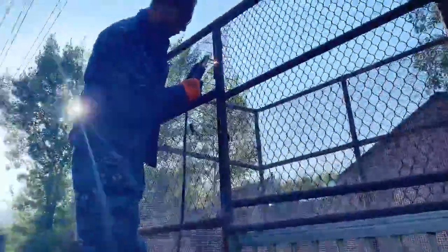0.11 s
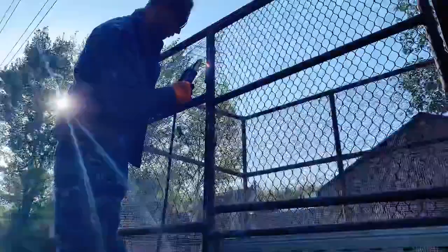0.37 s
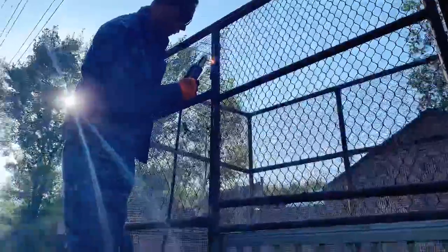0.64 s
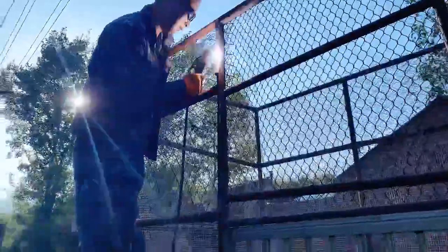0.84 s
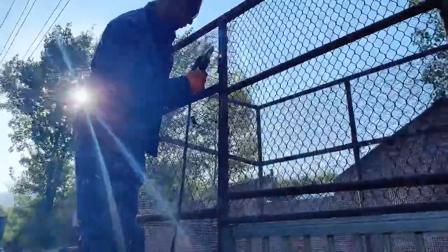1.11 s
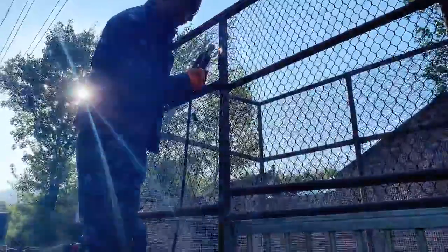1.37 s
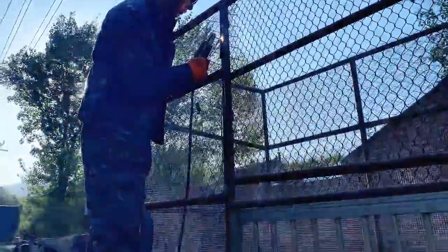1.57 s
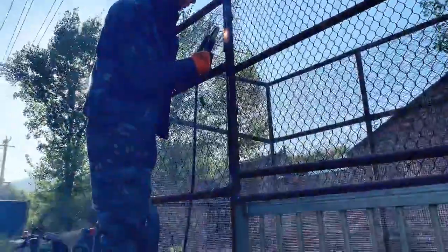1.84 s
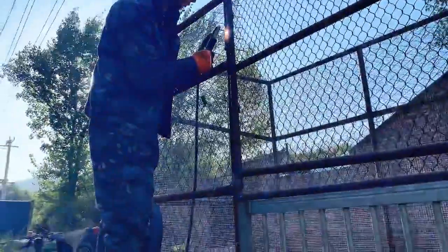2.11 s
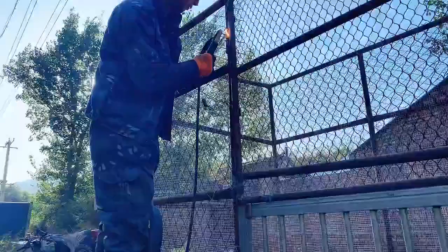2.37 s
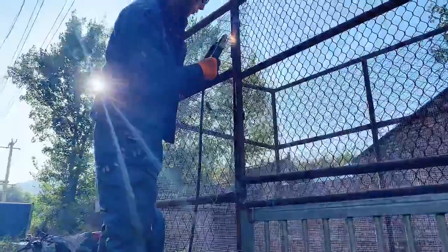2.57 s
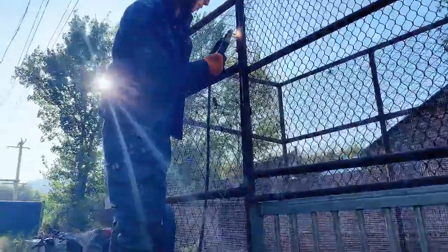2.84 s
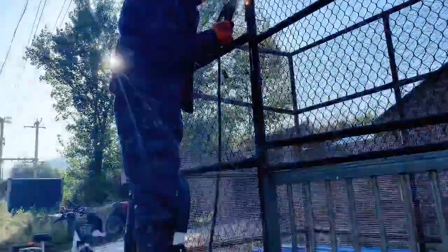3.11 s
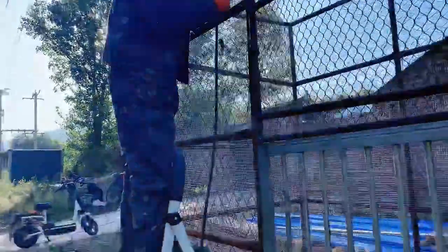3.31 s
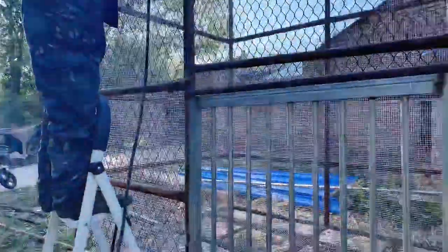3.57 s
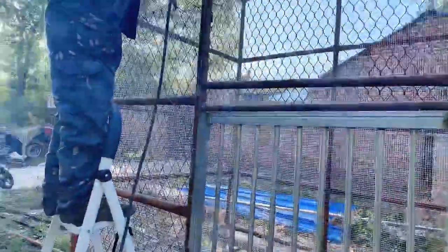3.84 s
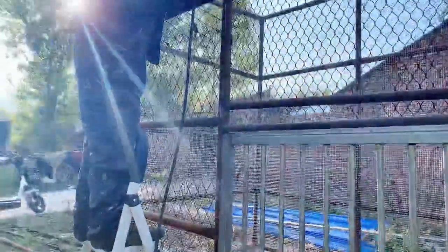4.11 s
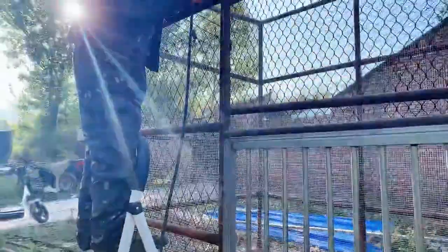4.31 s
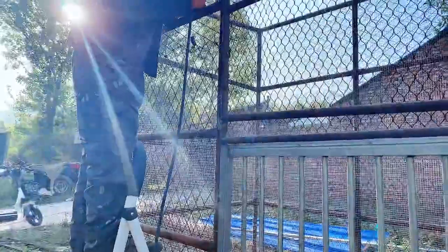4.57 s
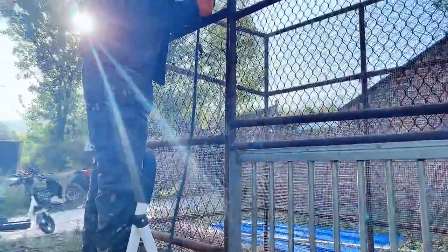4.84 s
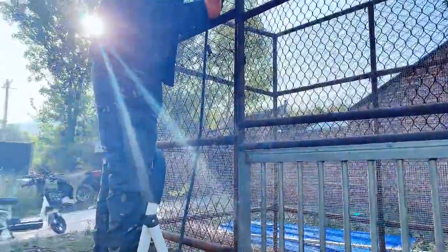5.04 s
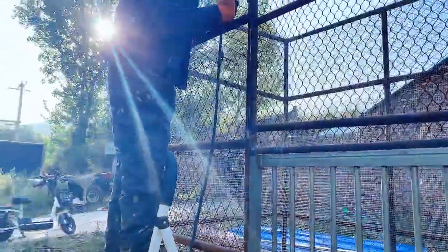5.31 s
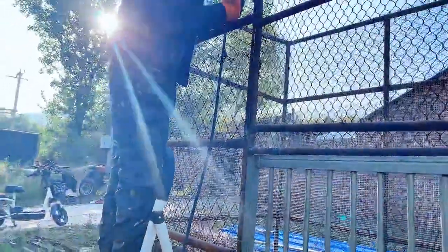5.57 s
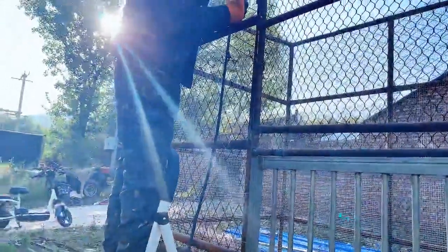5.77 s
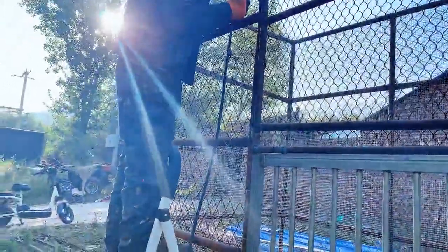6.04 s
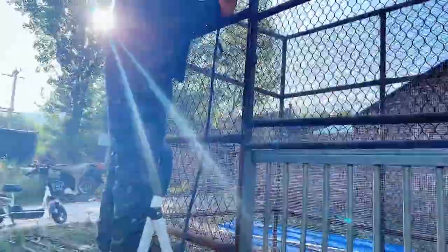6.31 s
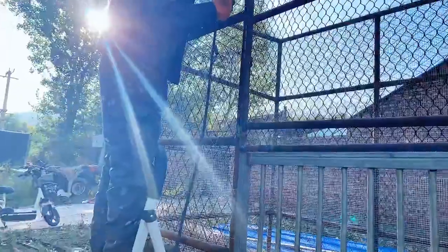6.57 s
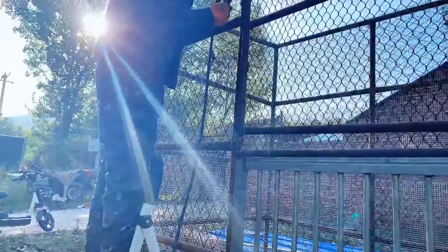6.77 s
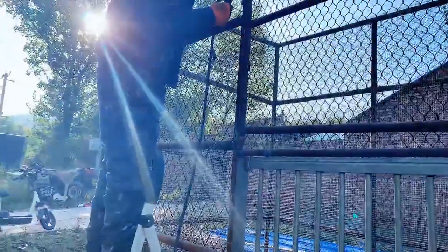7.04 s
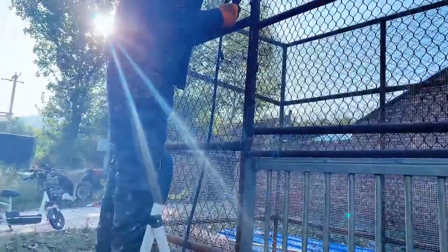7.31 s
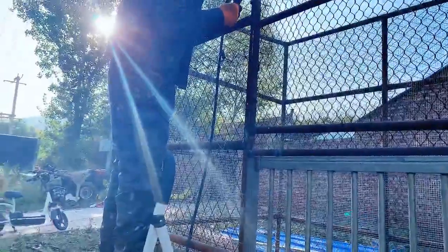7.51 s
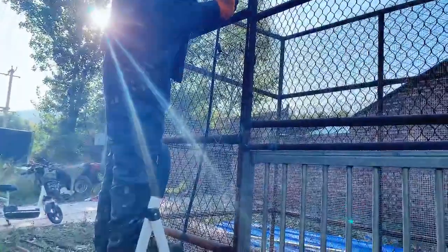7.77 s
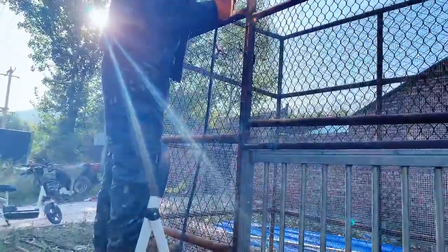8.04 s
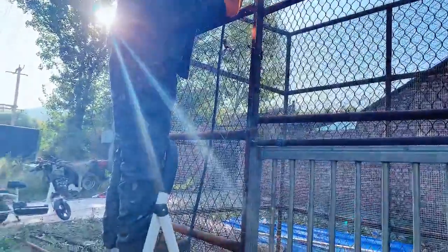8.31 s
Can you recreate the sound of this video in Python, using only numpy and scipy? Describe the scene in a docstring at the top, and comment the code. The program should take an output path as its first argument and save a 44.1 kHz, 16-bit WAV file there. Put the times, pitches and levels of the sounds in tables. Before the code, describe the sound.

Stick welding on a steel fence outdoors: crackling arc sizzle and sharp pops in short runs, tubes ringing faintly, wind rumble, distant engine thuds later.

```python
"""An arc sizzles and pops in short runs as a stick welder tacks a steel fence outdoors, and the tubes ring under it.
The arc is coloured noise with timed snaps and a close echo; the tubes are resonances shaken by sparks and pops.
The lowest mode murmurs on, shaped low noise buffets the microphone, and a faint wash and yard echoes lie behind.
Short scuffs make knocks on the steel and the thump of some pops, a slow engine thuds far off as pressure swings,
and near the end the rod sticks: a few unsteady harmonics and a rasp buzz at about twice the mains."""
import sys
import numpy as np
from scipy import signal
from scipy.io import wavfile
from scipy.ndimage import uniform_filter1d, minimum_filter1d, map_coordinates

SR = 44100
rng = np.random.default_rng(int(sys.argv[2]) if len(sys.argv) > 2 else 0)


def dump(signal):
    """Clip the signal to [-1, 1] and save it as 16-bit WAV at the path in sys.argv[1]."""
    limited = np.clip(np.atleast_2d(signal).T, -1, 1)
    pcm = np.round(limited * 32767).astype(np.int16)
    wavfile.write(sys.argv[1], SR, pcm)


def boost_factor(decibels):
    """Convert a level in decibels to a linear amplitude factor."""
    exponent = np.asarray(decibels, float) / 20
    return 10 ** exponent


N = 370440
T = np.arange(N) / SR  # s
HZ = np.fft.rfftfreq(4096, 1 / SR)


def evened(x):
    """Scales to rms 1."""
    return x / np.sqrt(np.mean(x ** 2) + 1e-20)


def read(points, hz):
    """Reads a spectrum table on a log-frequency axis."""
    f, value = np.transpose(points)
    return np.interp(np.log(hz + 1), np.log(f + 1), value)


def humps(modes, valley_db):
    """Gain in dB of resonances standing over a flat valley."""
    power = sum(boost_factor(db) ** 2 / (1 + (2 * (HZ - hz) / width) ** 2) for hz, width, db in modes)
    return 10 * np.log10(power + boost_factor(valley_db) ** 2)


def response(db):
    """The causal (minimum-phase) impulse response of a gain curve, energy 1."""
    log_gain = np.log(boost_factor(np.maximum(db, -100)))
    circle = np.concatenate([log_gain, log_gain[-2:0:-1]])
    spectrum = np.exp(np.conj(signal.hilbert(circle)))
    taps = np.fft.ifft(spectrum).real[:2048] * np.hanning(4096)[2048:]
    return taps / np.linalg.norm(taps)


def colour(x, taps):
    """Convolution cut to the length of the scene."""
    return signal.oaconvolve(x, taps)[:N]


def impulses(times, sizes):
    """A click train."""
    train = np.zeros(N)
    at = np.round(np.asarray(times) * SR).astype(int)
    np.add.at(train, np.clip(at, 0, N - 1), sizes)
    return train


def level(rows):
    """Gain drawn through (s, dB) points, silent outside them."""
    s, db = np.transpose(rows)
    return boost_factor(np.interp(T, s, db)) * (T >= s[0]) * (T < s[-1])


def bumps(rows):
    """Bell-shaped rises of gain."""
    return sum(boost_factor(db) * np.exp(-(2 * (T - s) / length) ** 2) for s, db, length in rows)


def wander(size):
    """Slow chance of rms 1, smooth over size samples."""
    return evened(uniform_filter1d(uniform_filter1d(rng.standard_normal(N), size), size))


def shifting(x, patchy_db, size, count):
    """The colour drifts in patches three bins wide and count frames long."""
    z = signal.stft(x, nperseg=size)[2]
    patches = uniform_filter1d(rng.standard_normal(z.shape), size=3, axis=0)
    patches = uniform_filter1d(patches, size=count, axis=1)
    return signal.istft(z * boost_factor(patchy_db * evened(patches)), nperseg=size)[1][:N]


def crackle(per_s, spread_db, hiss, clump_db):
    """Random sparks in clumps, most small and a few larger, over a hiss."""
    clumps = boost_factor(clump_db * wander(size=130))
    size = np.minimum(rng.exponential(1, N), 2.5)
    sparks = boost_factor(spread_db * size) * (rng.random(N) < per_s * clumps / SR)
    sparks = evened(sparks * rng.choice([-1, 1], N))
    return evened(sparks + hiss * np.sqrt(clumps) * rng.standard_normal(N))


# one row a run of the arc, gains before flares and wavering:
# start_s, end_s, sizzle_db, ringing_at_start_db, ringing_at_end_db
RUNS = [(0.0, 0.873, -28, -33.5, -34), (1.165, 2.052, -32, -41, -38), (2.06, 3.092, -30, -40, -39),
        (3.425, 4.333, -30.5, -48, -34.5), (4.897, 5.94, -30.5, -33.5, -39),
        (6.152, 6.213, -36.5, -45, -32), (6.751, 7.881, -28.5, -36, -30), (7.894, 8.4, -29, -25, -30.5)]
# the arc flares at each strike and when the gap shortens, and sometimes falters:
# peak_s, sizzle_lift_db, ringing_lift_db
FLARES = [(0.597, 0, 7.5), (0.7, -9.5, -5), (0.754, 2.5, 4.5), (1.173, 9.5, 14), (1.3, 6, 6),
          (1.345, 8.5, -1.5), (1.54, -3, 1), (2.08, 3, 7.5), (2.24, 2.5, 11.5), (2.474, 2.5, 16.5),
          (2.647, 1, 14.5), (2.76, 7, 3), (3.426, 12.5, 19.5), (3.565, 2.5, 7.5), (3.67, -0.5, 11),
          (4.375, 17, 22), (4.9, 9.5, 11.5), (5.193, 8, 8), (5.36, 2, 5), (5.415, 9, -1.5), (5.72, -1, 5.5),
          (6.19, 13, 7.5), (6.221, 6.5, 9.5), (6.762, -5, -4), (6.785, -8, -2.5), (6.865, -12, -12),
          (7.019, -4.5, 4.5), (7.12, -3, 6), (7.911, 3.5, 5.5), (8.065, -9.5, -3.5), (8.095, 8.5, 9.5),
          (8.166, 7.5, 6.5)]
FLARE_RISE_S, FLARE_FALL_S = 0.017, 0.045
CATCH_S = 0.00048  # the arc catches
FADE_DB_PER_S, UNSTEADY_DB = 300, 1.0  # dies away as the rod lifts, wavers while it burns


def burning():
    """Gains of sizzle and ringing for every run: a held level, lifted by flares, fading at the end."""
    lift_db = UNSTEADY_DB * np.array([wander(size=1200), wander(size=1200)])
    for s, *gains_db in FLARES:
        flare = np.exp(np.minimum((T - s) / FLARE_RISE_S, (s - T) / FLARE_FALL_S))
        lift_db += np.outer(gains_db, flare)
    out = []
    for start, end, sizzle_db, first_db, last_db in RUNS:
        held_db = np.array([sizzle_db + 0 * T, np.interp(T, [start, end], [first_db, last_db])])
        fade_db = FADE_DB_PER_S * np.maximum(T - end, 0)
        out.append(np.clip((T - start) / CATCH_S, 0, 1) * boost_factor(held_db + lift_db - fade_db))
    return np.array(out)


# what posts, glove and body near the arc make of its treble, one list a run,
# before the arc widens the narrow ones and softens them all: pitch_hz, width_hz, level_db
STANCES = [
    [(3930, 160, -3), (4960, 130, -11), (6040, 280, -14), (7140, 160, -7), (8630, 97, -9), (9800, 200, -12),
     (13000, 200, -10)],
    [(3750, 66, -6), (4870, 210, -8.5), (5700, 230, -11), (7130, 270, -3.5), (8680, 200, -5.5),
     (10030, 210, -8), (12700, 330, -7), (13500, 260, -12)],
    [(3690, 130, -1), (4930, 38, -2), (5670, 580, -3.5), (7440, 180, 1.5), (8800, 280, 0), (10340, 170, -3),
     (12200, 290, -1), (13600, 400, -6), (2940, 105, -4.5)],
    [(3830, 100, 0.5), (5470, 560, 2), (8370, 1600, -1.5), (11000, 420, -2), (12700, 660, -4)],
    [(3860, 200, -6.5), (5370, 180, -3), (6190, 260, 3), (8030, 230, 0.5), (9000, 200, -1.5),
     (9800, 200, -11), (12000, 460, -5), (13500, 710, -13)],
    [(3900, 260, 2), (5230, 630, 2), (7500, 1300, -2.5)],
    [(3170, 200, -4.5), (3870, 74, -6), (5940, 210, -4), (9050, 300, -8), (13070, 200, -1.5)],
    [(3100, 150, 17), (3900, 62, 15), (5230, 440, 8), (6100, 170, 9.5), (8140, 450, 4), (12400, 820, -20)],
]
# spectrum of the sizzle, shape only: pitch_hz, level_db (per Hz)
SIZZLE_SPECTRUM = [(1500, -45.5), (2600, -16), (3800, -12.5), (7200, -9), (10600, -15.5), (13100, -16),
                   (14400, -17.5), (15400, -50), (16400, -36)]
# spectrum of a pop, shape only: pitch_hz, level_db (per Hz)
POP_SPECTRUM = [(900, -35.5), (2100, -10.5), (3000, -18.5), (4500, -4), (7500, 4.5), (10500, -5),
                (13500, -2), (15000, -11), (16400, -52)]
# drops of metal shorting the arc: time_s, level_db (relative)
POPS = [(0.0419, -1.6), (0.0623, -6.7), (0.0751, 0.8), (0.1212, -7.9), (0.1345, 0.2), (0.1599, -3.1),
        (0.1761, -7.6), (0.1801, -1.9), (0.2148, -7.7), (0.2206, -1.9), (0.2449, -5.4), (0.2531, -2.7),
        (0.2896, -4.0), (0.3298, -5.4), (0.3814, -3.5), (0.3956, -6.4), (0.4059, -3.1), (0.4623, -7.2),
        (0.4711, -3.3), (0.4946, -4.6), (0.5458, -0.5), (0.5779, -7.8), (0.5904, -0.7), (0.6007, -1.7),
        (0.6232, 0.6), (0.7144, -1.9), (0.7573, -0.6), (0.7685, -2.4), (0.7842, -0.8), (0.8585, -5.3),
        (1.1721, -3.0), (1.3469, -0.2), (1.462, -0.2), (1.587, -1.0), (1.663, -0.6), (1.7078, -1.8),
        (1.7492, -5.1), (1.7803, 0.9), (1.8436, -5.0), (1.9008, -4.2), (1.9832, -0.9), (2.0783, -6.2),
        (2.0921, -5.6), (2.1012, -4.8), (2.1073, -4.8), (2.1648, 0.6), (2.1743, -1.8), (2.2304, -0.9),
        (2.2354, -4.1), (2.2638, -1.7), (2.2713, -0.4), (2.2797, -1.0), (2.3008, -0.4), (2.319, -0.1),
        (2.3249, -7.7), (2.3427, -1.6), (2.3839, -0.3), (2.3897, -4.9), (2.3967, -2.6), (2.4469, -2.0),
        (2.4612, -6.4), (2.4769, -0.5), (2.5387, -0.9), (2.5901, -8.0), (2.595, -5.2), (2.6164, -1.2),
        (2.648, -0.8), (2.6988, -6.5), (2.7038, 0.2), (2.7302, -7.8), (2.7618, 0.8), (2.7659, 0.9),
        (2.8234, -8.0), (2.9095, -0.4), (2.9133, -0.4), (2.9366, -6.8), (2.9774, -4.8), (3.0012, -2.2),
        (3.007, -6.3), (3.028, -7.7), (3.0361, -7.6), (3.0495, -0.7), (3.4277, -4.0), (3.5653, -0.2),
        (3.6613, -2.3), (3.7593, -0.1), (3.8093, -0.4), (3.8578, -5.5), (3.9074, -0.1), (3.9388, -2.0),
        (3.9716, -5.4), (3.986, -2.1), (3.99, -4.8), (4.041, -2.4), (4.068, -1.3), (4.1365, 0.4),
        (4.1808, -7.5), (4.1896, -4.6), (4.2046, -5.6), (4.2094, -7.7), (4.2277, -0.1), (4.2749, -1.4),
        (4.3175, -1.8), (4.3363, 0.3), (4.901, -6.1), (5.0268, -6.3), (5.0312, -5.8), (5.091, -0.9),
        (5.1241, -5.8), (5.1381, -2.2), (5.1934, 0.2), (5.2001, -2.7), (5.2217, -5.2), (5.2546, -5.7),
        (5.3078, -6.8), (5.314, -7.1), (5.3685, -6.2), (5.374, -7.6), (5.4133, 0.3), (5.4296, -2.9),
        (5.4662, -4.2), (5.5152, -1.5), (5.625, -0.0), (5.6814, -3.9), (5.7085, -2.3), (5.7251, -1.8),
        (5.7401, -5.5), (5.7453, -7.8), (5.7679, -4.4), (5.7859, -3.2), (5.8995, -7.9), (6.1569, -2.3),
        (6.1861, -8.0), (6.765, -5.3), (6.7822, -2.1), (6.7859, 0.4), (6.7892, -5.5), (6.7941, -1.8),
        (6.8044, -4.0), (6.8626, -6.1), (6.8732, -1.2), (6.8825, -1.3), (6.8979, -0.9), (6.9298, -2.3),
        (6.9646, -3.9), (6.9728, -2.2), (7.0222, -7.2), (7.0259, -0.9), (7.0501, -5.7), (7.0808, -5.7),
        (7.0855, 0.3), (7.1216, -2.6), (7.1493, -2.0), (7.2391, -0.8), (7.2953, 1.2), (7.3266, -3.8),
        (7.3294, -7.1), (7.3383, -0.6), (7.3942, -2.0), (7.3993, -5.6), (7.414, -7.8), (7.4626, -0.3),
        (7.4982, -6.8), (7.5247, 1.2), (7.5414, -7.1), (7.5498, -0.3), (7.5585, -1.0), (7.6089, -4.8),
        (7.6934, -0.8), (7.6976, -8.0), (7.7655, 1.2), (7.7792, -5.3), (7.801, 0.5), (7.8068, -8.0),
        (8.0879, -2.2), (8.1555, 0.8), (8.1705, -4.0), (8.183, -12), (8.3327, -1.9), (8.364, -11),
        (8.395, -11)]
# the echo of the nearest post, one row a run, before sway:
# delay_at_start_ms, delay_at_end_ms, strength (relative ratio)
ECHOES = [(0.896, 0.752, 0.45), (0.73, 0.94, 0.064), (0.985, 0.82, 0.36), (1.025, 1.044, 0.49),
          (0.815, 0.51, 0.15), (1.177, 1.24, 0.23), (1.015, 0.996, 0.41), (1.32, 1.37, 0.07)]
# how bright or dull the pops sound, one value a run: tilt_db (per octave)
POP_TILTS = [0.5, 3, 1.5, -0.7, 3.2, 3, -3, -6]
# chance small pops, one value a run: rate (per second)
SMALL_POPS_PER_S = [14, 7, 12, 10, 12, 0, 10, 0]
SMALL_POP_DB, SMALL_SPREAD_DB = -11, 6  # loudest small pop, and how far below it they reach


def arc(gains):
    """Sizzle and pops of each run pass the reflections of that stance; a swaying hand moves the echo."""
    s, db = np.transpose(POPS)
    per_s = sum(rate * (T > run[0]) * (T < run[1]) for run, rate in zip(RUNS, SMALL_POPS_PER_S))
    small = (rng.random(N) < per_s / SR) * boost_factor(SMALL_POP_DB - SMALL_SPREAD_DB * rng.random(N))
    pops = impulses(s - .0001, boost_factor(db)) + small
    # a shorted arc falls quiet just before it pops, and sizzles louder just after
    hush = 1 - .5 * np.minimum(np.roll(colour(pops > 0, np.ones(180)), -185), 1)
    glow = 1 + .55 * np.minimum(colour(pops, np.exp(-np.arange(2000) / (.007 * SR))), 1)
    sizzle = evened(hush * glow * crackle(per_s=450, spread_db=5, hiss=1.25, clump_db=3.4))
    # each pop spits around its snap
    around = np.exp(-abs(np.arange(300) - 60) / (.0007 * SR))
    spit = np.roll(colour(pops, around), -60) * rng.standard_normal(N)
    bursts = pops + boost_factor(-18) * spit
    sway = 1 + 0.035 * wander(size=4000)
    out = np.zeros((2, N))  # sizzle, snaps
    for run, gain, stance, echo, tilt_db in zip(RUNS, gains, STANCES, ECHOES, POP_TILTS):
        start, end = run[:2]
        first_ms, last_ms, strength = echo
        span = slice(round((start - .012) * SR) * (start > 0), round((end + .15) * SR))
        ripple = humps([(hz, max(width, 220), db) for hz, width, db in stance], valley_db=-20.0)
        fizz_taps = response(read(SIZZLE_SPECTRUM, HZ) + 0.75 * ripple)
        # a pop is too short to fill the resonances
        tilt = tilt_db * np.log2(HZ / 4000 + .1)
        snap_taps = response(read(POP_SPECTRUM, HZ) + tilt + .4 * ripple)
        snap_taps = 1.2 * snap_taps / abs(signal.hilbert(snap_taps)).max()
        snaps = signal.oaconvolve((bursts * (T < end))[span], snap_taps)
        fizz = signal.oaconvolve((gain * sizzle)[span], fizz_taps)
        k = np.arange(min(len(fizz), N - span.start))
        lag = np.linspace(first_ms, last_ms, len(k)) * sway[span.start + k] * SR / 1000  # samples
        for layer, direct, share in zip(out, (fizz, snaps), (.9, 1.5)):
            reflected = map_coordinates(direct, [k - lag], order=3)
            layer[span.start + k] += direct[k] + share * strength * reflected
    drifting = shifting(out[0], patchy_db=2.5, size=256, count=45)
    drifting = shifting(drifting, patchy_db=1.8, size=128, count=12)
    return drifting + shifting(out[1], patchy_db=1.5, size=32, count=100), pops


# modes of the fence tubes, lowest first, widths before any broadening: pitch_hz, width_hz
TUBES = [(325, 26.4), (670, 118), (1040, 126), (1335, 131), (1580, 147), (1850, 57), (2100, 124),
         (2400, 44)]
# how strongly the spot being welded shakes each mode above the lowest, one row a run:
# mode_2_db, mode_3_db, mode_4_db, mode_5_db, mode_6_db, mode_7_db, mode_8_db
SPOTS = [(-10.5, -6, -6.5, -1.5, -8, -9.5, -6.5), (-14, -7, -10.5, -0.5, -29.5, -0.5, -7),
         (-5.5, -19, 3, -18, -24, 2.5, -42), (-11, -43, 3.5, -43, -24, 2.5, -41),
         (-11.5, -24, -5.5, -10, -6.5, 1.5, -17), (-2, -17, 1, -9, 2, 0, -26),
         (-10.5, -11.5, -2, -8, -8, 3.5, -15), (-3.5, -6, -1, -9, -10, 0, -12.5)]
KICK_DB, FITFUL_DB = 29, 2.2  # a pop against the steady shaking, and how much the drive wavers


def tubes(gains, pops):
    """The fence modes above the lowest, each shaken fitfully by the arc and kicked by its pops."""
    out, shake = np.zeros(N), crackle(per_s=500, spread_db=3.5, hiss=0.55, clump_db=4)
    for (hz, width), strengths_db in zip(TUBES[1:], np.transpose(SPOTS)):
        strength = boost_factor(strengths_db) @ gains * boost_factor(FITFUL_DB * wander(size=900))
        drive = np.roll(shake, rng.integers(N)) + boost_factor(KICK_DB) * pops
        mode = response(2.0 * humps([(hz, 2.1 * width, 0)], valley_db=-71))
        out += colour(strength * drive, mode)
    return boost_factor(-9) * shifting(out, patchy_db=3, size=1024, count=6)


# the lowest mode and a flutter under it: time_s, level_db
DRONE = [(0.0, -48.5), (0.3, -47), (0.9, -41), (1.15, -50.5), (1.85, -47), (2.55, -32.5), (3.05, -51.5),
         (3.39, -54), (3.55, -46), (4.4, -41.5), (4.84, -51.5), (5.0, -47.5), (5.8, -44), (6.5, -50),
         (7.0, -47), (7.85, -48), (8.05, -35), (8.4, -41.5)]
# the lowest mode swells briefly: peak_s, level_db, length_s
SWELLS = [(0.31, -32, 0.039), (0.45, -35, 0.084), (0.75, -34.5, 0.063), (0.89, -34.5, 0.055),
          (1.9, -34.5, 0.074), (2.08, -29, 0.0063), (2.5, -46, 0.091), (3.11, -43, 0.049),
          (3.93, -34, 0.06), (4.3, -38, 0.05), (4.58, -39, 0.064), (1.01, -47, 0.065), (4.4, -35, 0.048),
          (4.91, -29.5, 0.028), (7.13, -37.5, 0.049), (7.99, -23.5, 0.04)]
FLUTTER_DB = 2.8


def drone():
    """Noise through the lowest mode murmurs on over a soft flutter; a sharper ring swells in it."""
    shape = humps([(*TUBES[0], 0), (200, 50, -8)], valley_db=-66)
    shape = shape + read([(70, -22), (150, -2.5), (2000, -7.5), (9000, -47)], HZ)
    flutter = boost_factor(FLUTTER_DB * wander(size=1000))
    murmur = colour(rng.standard_normal(N) * flutter, response(0.56 * shape))
    ring = colour(rng.standard_normal(N), response(1.2 * shape))
    return level(DRONE) * evened(murmur) + bumps(SWELLS) * evened(ring)


# spectrum of the wind, shape only: pitch_hz, level_db (per Hz)
WIND_SPECTRUM = [(8.8, -48.5), (15, 10.5), (32, 9), (48, 11), (112, -18.5), (150, -12.5), (200, -16.5),
                 (330, -120)]
# steady wind, before its wavering: time_s, level_db
BREEZE = [(0.0, -27), (0.2, -46), (0.35, -66), (1.29, -60), (1.4, -44), (2.1, -35), (2.2, -26.5),
          (2.45, -28.5), (2.92, -43.5), (3.3, -36.5), (4.6, -39), (5.5, -36), (6.05, -43.5), (6.7, -54),
          (7.1, -35.5), (7.9, -53), (8.4, -32)]
# single buffets on the microphone: peak_s, level_db, length_s
GUSTS = [(0.16, -26, 0.053), (1.47, -27.5, 0.11), (1.78, -30, 0.052), (1.97, -35, 0.095),
         (2.16, -28, 0.036), (2.84, -33.5, 0.031), (3.21, -21, 0.039), (3.47, -36, 0.1),
         (3.96, -23, 0.0085), (4.095, -17, 0.05), (4.23, -24.5, 0.051), (4.41, -22.5, 0.047),
         (4.47, -22, 0.042), (4.94, -33, 0.053), (5.63, -29.5, 0.1), (6.81, -30.5, 0.067)]


def wind():
    """Low turbulence on the microphone: slow noise swings, levelled, then shaped by breeze and gusts."""
    rumble = colour(rng.standard_normal(N), response(read(WIND_SPECTRUM, HZ)))
    swings = rumble / np.sqrt(uniform_filter1d(rumble ** 2, size=2000) + 1e-6)
    breeze = level(BREEZE) * boost_factor(0.52 * wander(size=2500))
    return (breeze + bumps(GUSTS)) * evened(swings)


# spectrum of the outdoor wash, shape only: pitch_hz, level_db (per Hz)
AIR_SPECTRUM = [(35, -32), (60, -27), (112, -5.5), (240, -26.5), (324, -49), (503, -28), (875, -20),
                (1150, -23.5), (3750, -25), (15000, -55.5)]
AIR_DB = -49  # before the patches


def air():
    """The outdoor wash: shaped noise murmuring in narrow patches."""
    wash = colour(rng.standard_normal(N), response(read(AIR_SPECTRUM, HZ) - 25 * (HZ > 14200)))
    return boost_factor(AIR_DB) * shifting(wash, patchy_db=4.3, size=1024, count=5)


# decay of the first slope of the yard echoes: pitch_hz, t60_s
YARD = [(300, 0.19), (2000, 0.45), (6000, 0.37), (12000, 0.095)]


def yard(x):
    """Dense scattered echoes from the yard start within a few milliseconds and decay at a rate set by pitch."""
    at = np.arange(200, SR - 20, 20)
    taps = np.zeros(SR)
    build_up = np.tanh(at / (0.0008 * SR))
    taps[at + rng.integers(0, 20, len(at))] = rng.choice([-1., 1.], len(at)) * build_up
    hz, t, z = signal.stft(taps, SR, nperseg=256)
    fall_db = -60 * t / read(YARD, hz)[:, None]
    # far buildings add a weaker, slower slope
    decay = boost_factor(fall_db) + boost_factor(-18.5 + 0.21 * fall_db)
    tail = signal.istft(z * decay, SR, nperseg=256)[1]
    return colour(x, tail / np.linalg.norm(tail))


# knocks on the steel and the deeper thump of some pops, levels before a common trim:
# start_s, level_db, pitch_hz, length_s
KNOCKS = [(0.595, -10, 1280, 0.0044), (2.072, -7.5, 1000, 0.005), (2.238, -20, 343, 0.0054),
          (2.45, -34, 215, 0.0029), (2.647, -15, 1700, 0.0056), (2.765, -7.5, 2100, 0.0027),
          (3.116, -9, 162, 0.0017), (3.456, -13.5, 2120, 0.0079), (3.67, -16.5, 630, 0.0097),
          (4.387, -16, 352, 0.0071), (6.222, -8.5, 1900, 0.0066), (6.223, -16, 684, 0.0027),
          (7.025, -9, 2260, 0.0059), (7.114, -11, 1920, 0.011), (7.394, -2.5, 2120, 0.0021),
          (7.915, -5.5, 209, 0.01), (8.086, -9, 2020, 0.013), (8.16, -3, 2200, 0.0045),
          (8.169, 4, 1430, 0.0017), (8.258, -14, 4500, 0.0036)]


def knocks():
    """A short scuff of noise drives the tube modes around the pitch of each knock or thump."""
    out, t = np.zeros(N), np.arange(2000) / SR
    modes = humps([(hz, width, 0) for hz, width in TUBES], valley_db=-10)
    modes = modes + read([(5000, 0), (12000, -20)], HZ)
    for s, db, hz, length in KNOCKS:
        blow = rng.standard_normal(len(t)) * t * np.exp(-t / max(length, .001) * 2)
        # falls off to either side of the pitch, more gently far away
        steep = 9 * np.log2(HZ / hz + 0.019) ** 2
        focus_db = -steep / (1 + 0.15 * abs(np.log2(HZ / hz + .01)))
        ring = signal.oaconvolve(blow, response(modes + focus_db))
        part = out[round(s * SR):][:len(ring)]
        part += (boost_factor(db - 8.5) * ring / abs(ring).max())[:len(part)]
    return out


# loudness of the thuds, before their scatter: time_s, level_db
ENGINE = [(3.4, -31.5), (4.07, -24.5), (4.2, -35), (4.65, -26.5), (4.75, -28), (5.65, -22.5), (6.5, -28),
          (7.2, -19), (7.35, -25), (7.7, -29), (8.3, -28.5)]
FIRST_THUD_S, THUD_GAP_S, THUD_JITTER_S, THUD_SCATTER_DB = 3.371, .11305, 0.0025, 2.5


def engine():
    """Each firing arrives as a low pressure swing of its own pitch, with a loose puff of noise around it."""
    starts = np.arange(FIRST_THUD_S, T[-1] - .1, THUD_GAP_S)
    out, t = np.zeros(N), np.arange(3000) / SR - .024
    puff_taps = response(humps([(186, 170, 0)], valley_db=-60) * 2)
    body = evened(colour(rng.standard_normal(N), puff_taps))
    for start, (late, louder, higher) in zip(starts, rng.standard_normal((60, 3))):
        at = round((start + THUD_JITTER_S * late) * SR)
        thud = -np.cos(2 * np.pi * 90 * (1 + .1 * higher) * t) * np.exp(-(t / 0.0088) ** 2)
        puff = boost_factor(-18) * body[at:at + len(t)] * np.exp(-abs(t) / 0.014)
        level_db = np.interp(start, *np.transpose(ENGINE)) + THUD_SCATTER_DB * louder
        out[at:at + len(t)] += boost_factor(level_db) * (thud + puff)
    return out


# loudness of the stuck rod: time_s, level_db
BUZZ = [(7.895, -41), (7.943, -21.5), (8.009, -20), (8.045, -38)]
# harmonics of its hum, relative: multiple (of BUZZ_HZ), level_db
BUZZ_ORDERS = [(1, -5.5), (2, 0.5), (3, -6), (4, -13), (7, -20)]
BUZZ_HZ = 98.2  # centre pitch


def buzz():
    """The stuck rod hums at about twice the mains, unsteady, rasping once a cycle."""
    turns = np.cumsum(BUZZ_HZ * (1 + 0.033 * wander(size=250))) / SR
    hum = sum(boost_factor(db + 0.99 * wander(size=300)) * np.cos(2 * np.pi * k * turns) for k, db in BUZZ_ORDERS)
    rasp = (1.8 + np.exp(-(turns % 1) / 0.71)) * rng.standard_normal(N)
    rasp_spectrum = [(200, 0), (600, 2.0), (2000, -4), (6000, -7), (12000, -44)]  # Hz, dB
    rasp = colour(rasp, response(read(rasp_spectrum, HZ)))
    return uniform_filter1d(level(BUZZ), 300) * (0.55 * evened(rasp) - evened(hum))


def scene():
    """Work sounds with their echoes, then the surroundings."""
    gains = burning()
    sparks, pops = arc(gains[:, 0])
    work = sparks + tubes(gains[:, 1], pops) + knocks() + buzz()
    surroundings = drone() + engine() + wind() + air()
    return (work + boost_factor(-12.5) * yard(work) + surroundings)[None]


def top_cut(x):
    """Nothing passes above the cut-off."""
    return signal.sosfilt(signal.butter(12, 16510, fs=SR, output="sos"), x)


ABOVE_EDGE_DB, EDGE_HZ = -12, 15100  # treble shelf


def record(dry):
    """A peak limiter pulls loud pops under full scale and lets go at 250 dB a second; the top treble drops."""
    over_db = np.maximum(20 * np.log10(abs(dry[0]) + 1e-9) + 0.082, 0)
    fall_db = T * 250
    held_db = np.maximum.accumulate(over_db + fall_db) - fall_db
    held_db = -minimum_filter1d(-held_db, size=41)  # looks ahead of each peak
    limited = dry / boost_factor(uniform_filter1d(np.maximum(held_db, 0), size=21))
    low_pass = signal.firwin(255, EDGE_HZ, window="blackman", fs=SR)
    body = signal.oaconvolve(limited, low_pass[None], "same")
    return top_cut(body + boost_factor(ABOVE_EDGE_DB) * (limited - body))


dry = scene()
out = record(dry)
dump(out)
```